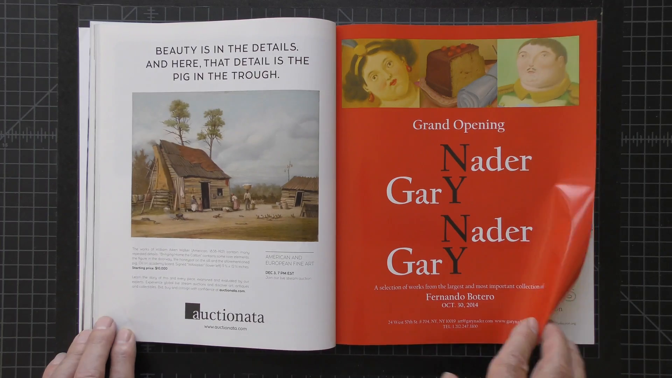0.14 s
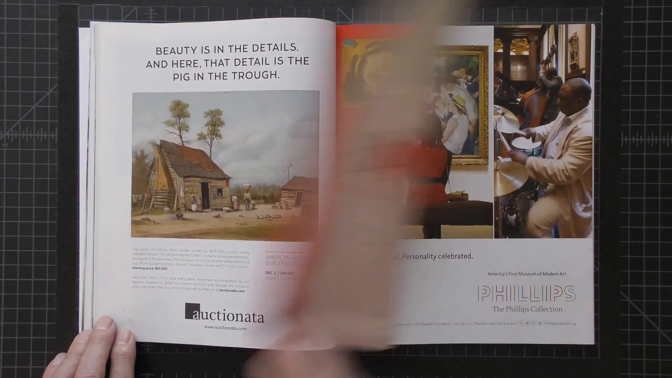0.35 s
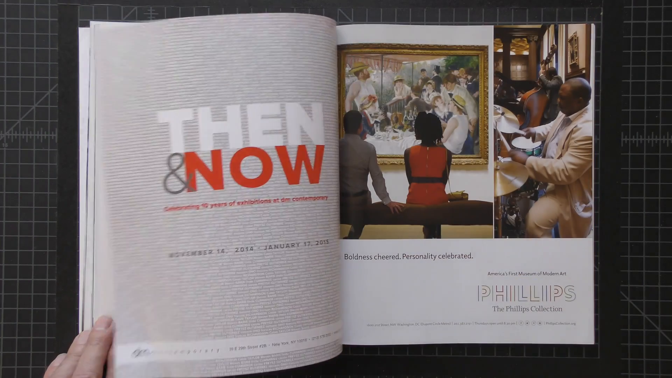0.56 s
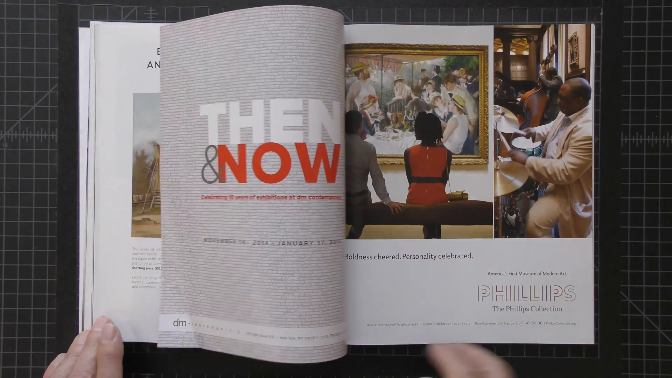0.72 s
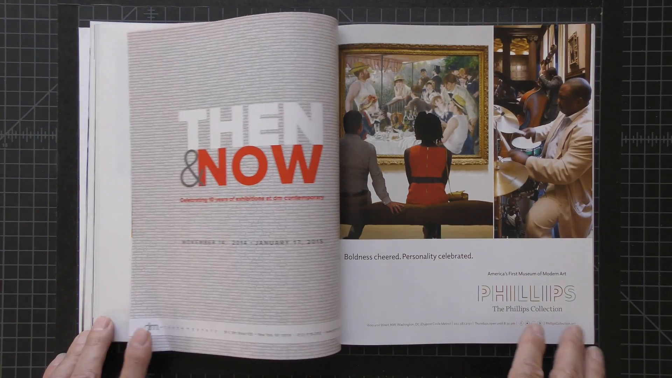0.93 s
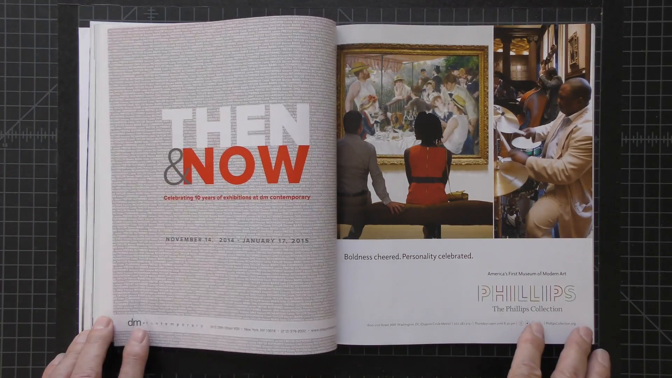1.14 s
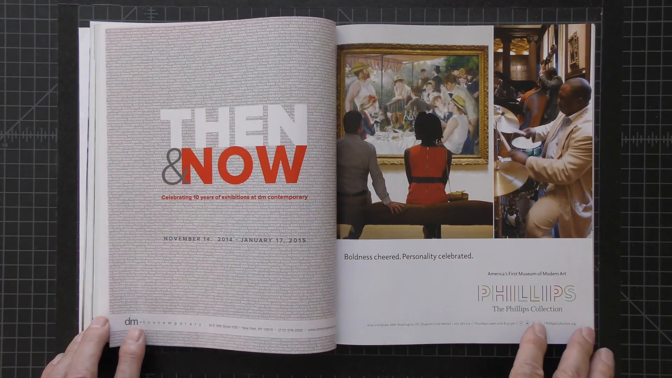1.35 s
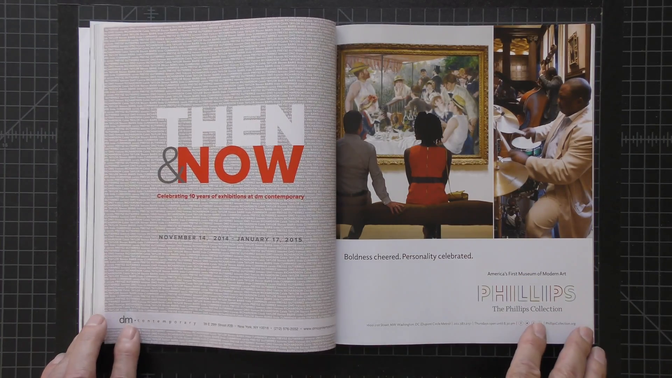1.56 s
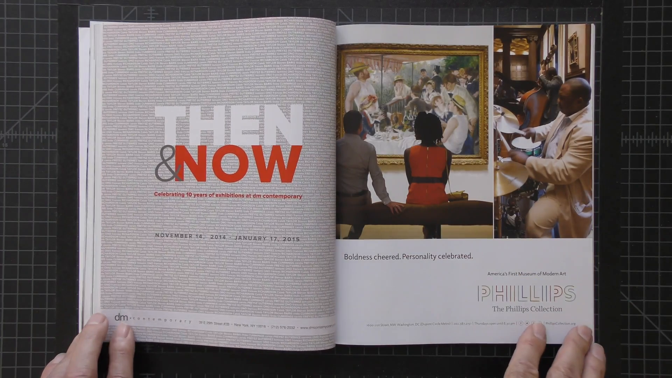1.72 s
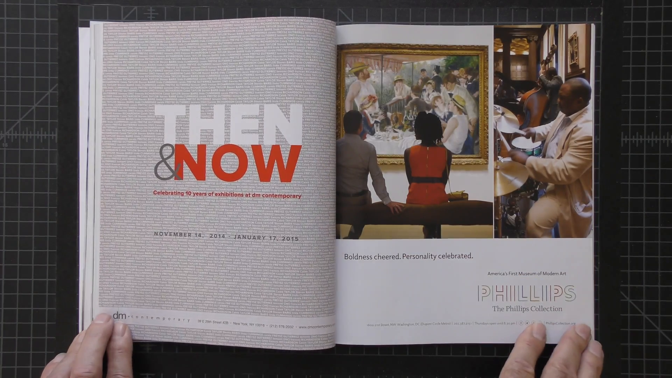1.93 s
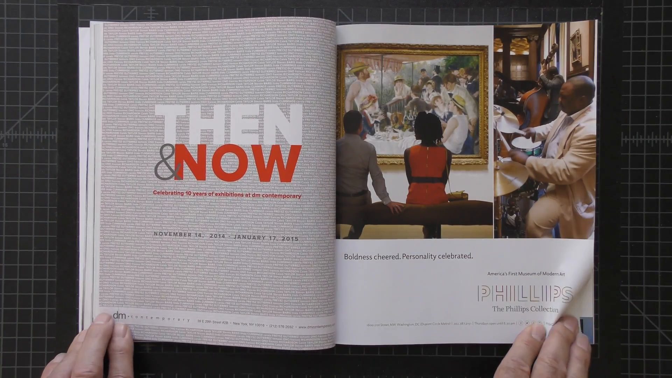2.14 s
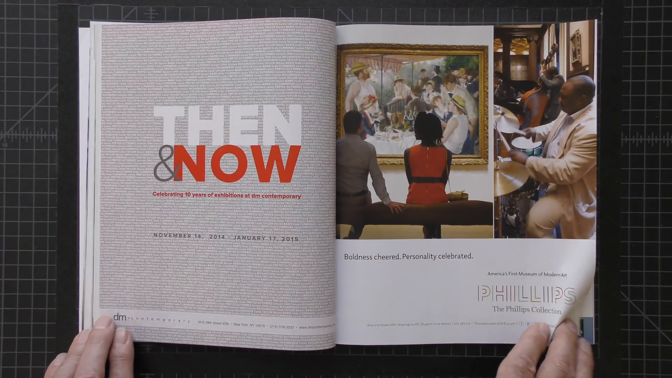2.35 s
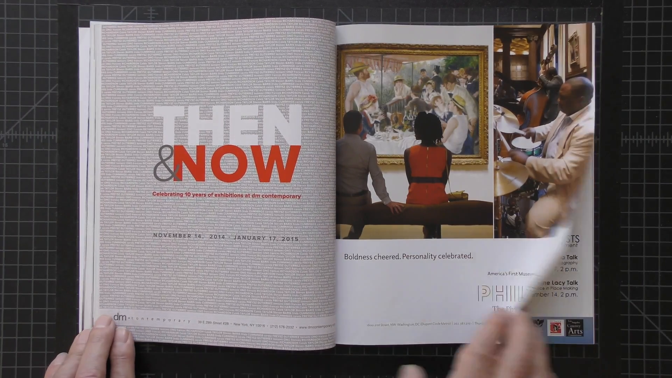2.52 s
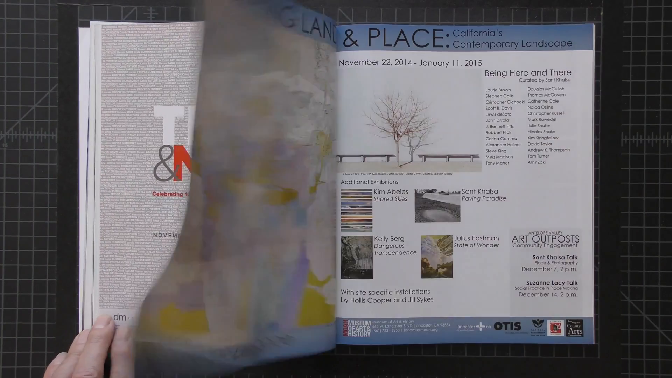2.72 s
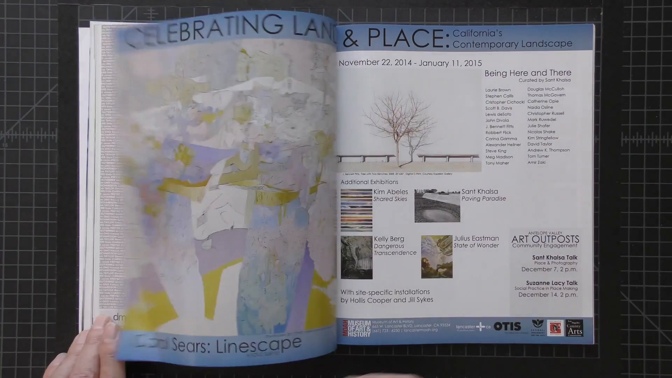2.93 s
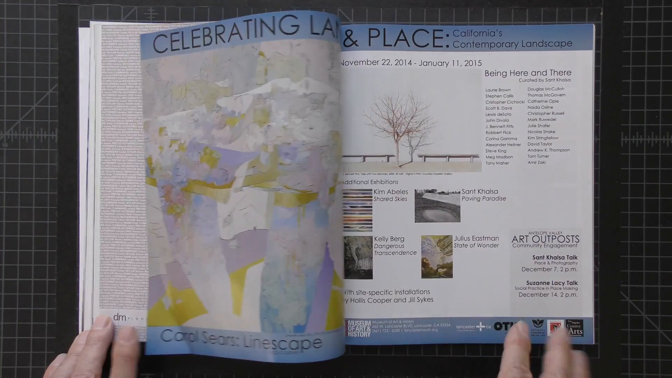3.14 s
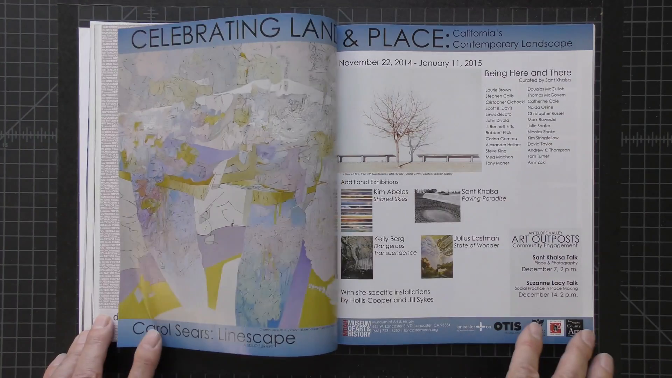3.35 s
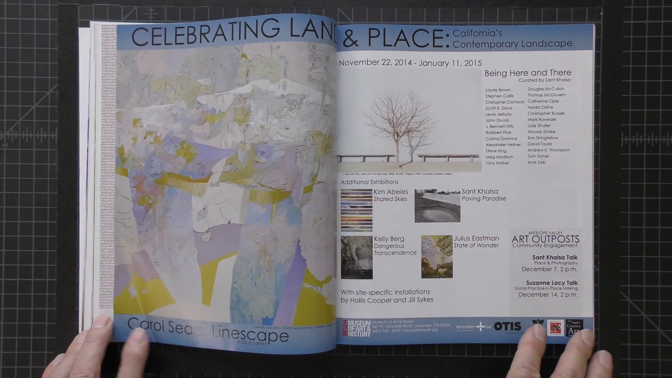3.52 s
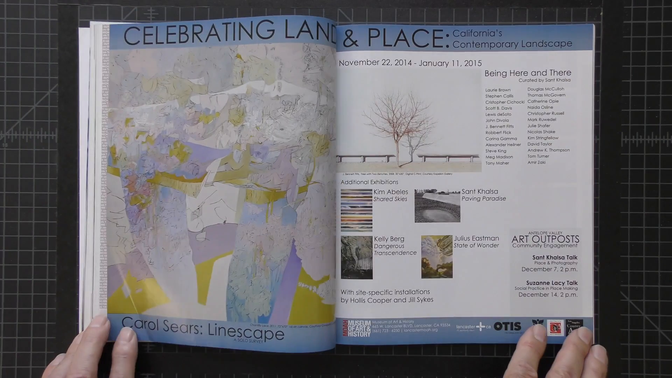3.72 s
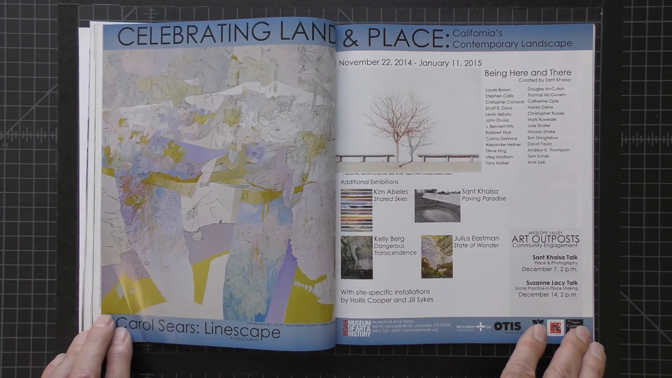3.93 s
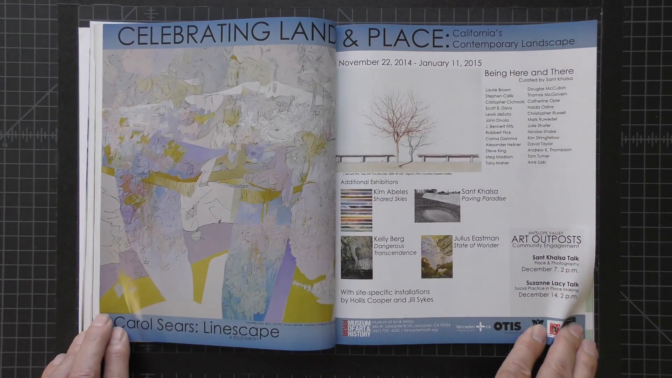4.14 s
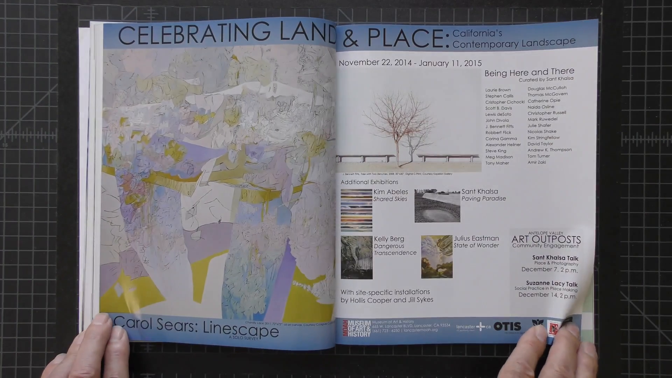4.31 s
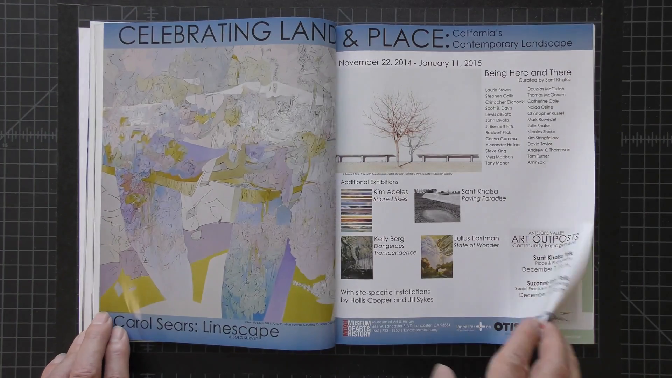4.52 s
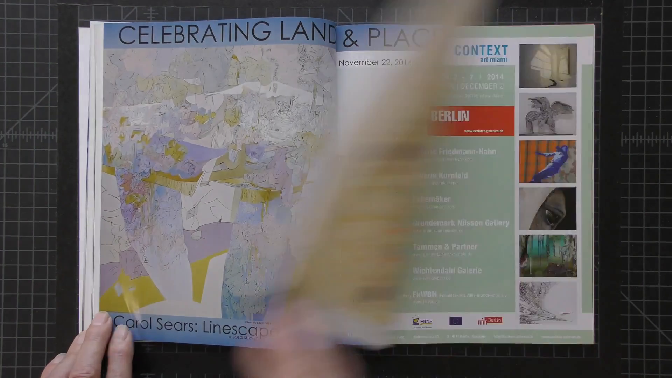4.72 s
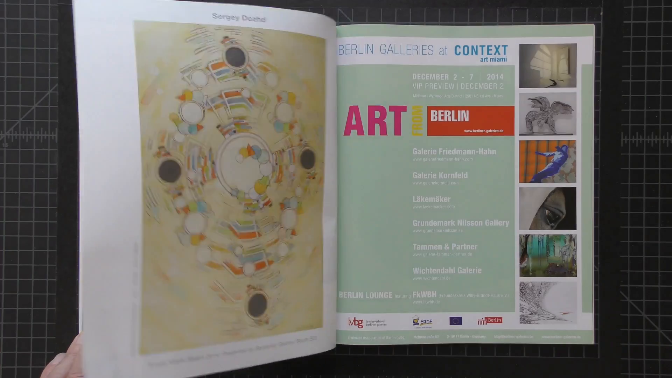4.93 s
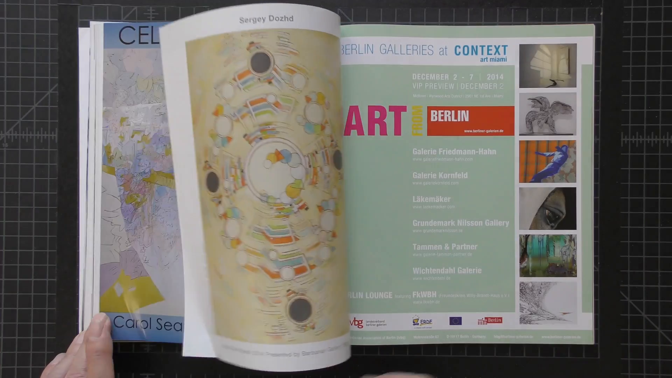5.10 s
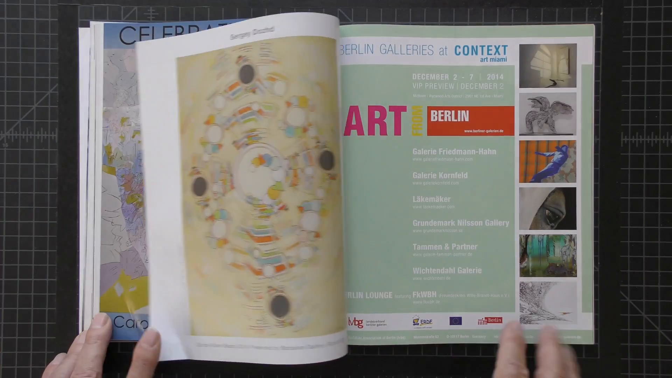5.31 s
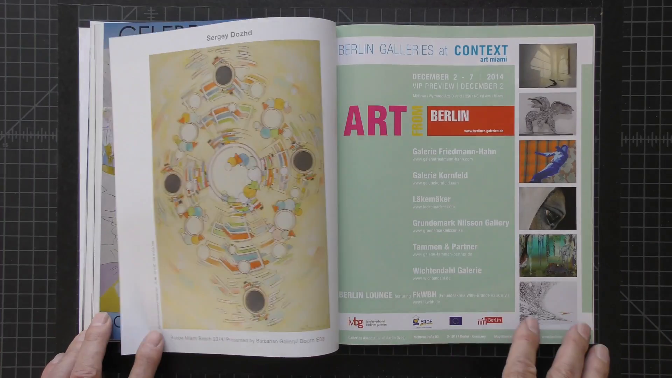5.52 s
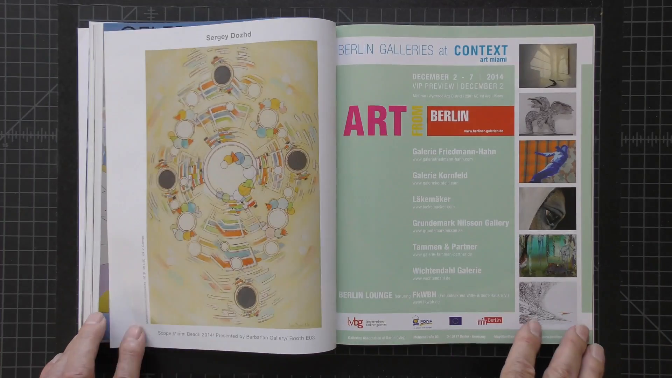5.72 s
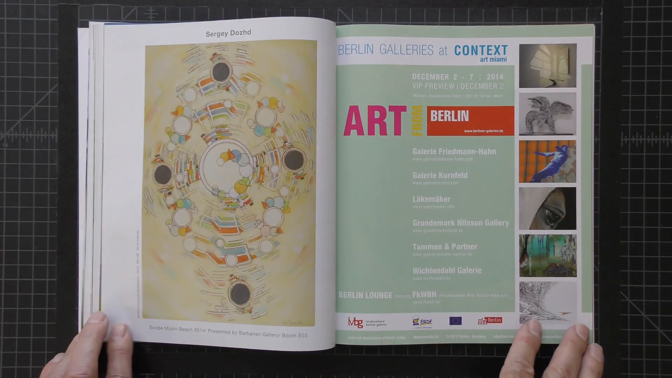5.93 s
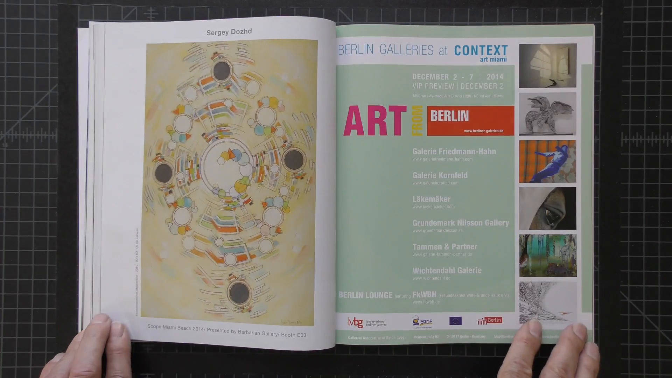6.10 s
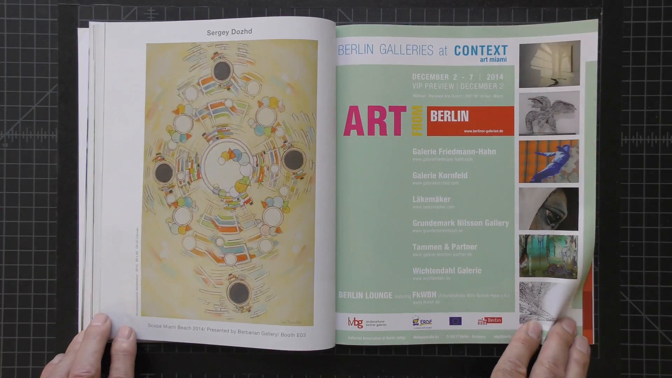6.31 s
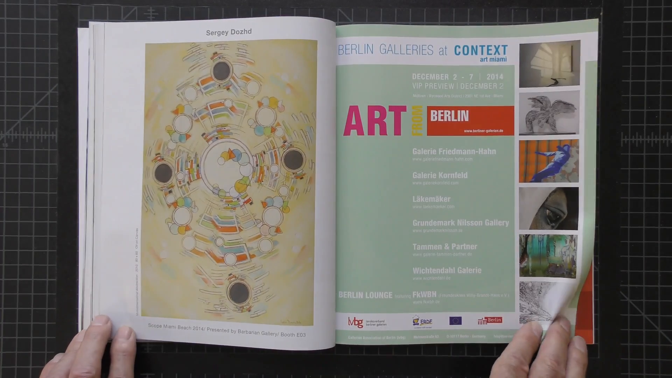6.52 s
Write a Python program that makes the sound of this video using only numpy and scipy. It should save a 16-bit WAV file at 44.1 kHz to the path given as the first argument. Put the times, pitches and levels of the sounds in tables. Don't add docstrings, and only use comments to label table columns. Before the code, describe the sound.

In a quiet, live-sounding room, thick glossy paper is lifted and turned three times. The first turn is a dense loud crackle with a firm thump; the second starts with a hard pinch click, then snaps over more dully; the third is a quick crisp flap. Small skin rubs and ticks separate them. Soft low woody knocks follow near the end, then light finger rustles. Near pair of microphones, slight low hum.

```python
import sys
import numpy as np
from scipy import signal
from scipy.fft import rfft, irfft, next_fast_len
from scipy.io import wavfile
from scipy.ndimage import uniform_filter1d

SR = 44100
rng = np.random.default_rng(int(sys.argv[2]) if len(sys.argv) > 2 else 0)


def elevation(decibels):
    levels = np.asarray(decibels, float)
    return 10 ** (levels / 20)


def unload_audio(sound):
    columns = np.transpose(np.atleast_2d(sound))
    steps = np.round(np.clip(columns, -1, 1) * 32767)
    wavfile.write(sys.argv[1], SR, steps.astype(np.int16))


N = 293706

# pitch_hz, level_db
AIR_SPECTRUM = [(15, -12), (25, -13.5), (50, -5.5), (100, -9.5), (145, -1.5), (440, -7), (607, -23),
                (962, -15), (1740, -13), (2110, -13), (4370, -25), (7310, -28.5), (11600, -26),
                (16000, -29)]
# pitch_hz, likeness (0 to 1)
AIR_LIKENESS = [(30, 0.15), (130, 0.5), (400, 0.12), (1500, 0.14), (6000, 0), (15000, 0.3)]
AIR_DB, HUM_HZ, HUM_DB, HUM_LINE_DB = -57.5, 128, -65, -67

# start_s, length_s, level_db, paper_hz, hiss_above_paper_db
LEFT_STROKES = [(1.297, 0.077, -57.5, 1860, -8.5), (1.415, 0.16, -60, 1980, -12),
                (1.634, 0.062, -55.5, 2210, -9.5), (1.7, 0.19, -74, 2200, 2.5),
                (2.196, .11, -60.5, 2760, -10), (3.15, 0.046, -50.5, 1230, -11.5),
                (3.547, .13, -61, 2450, -3.5), (3.741, .074, -53, 2080, -7),
                (3.893, 0.086, -56.5, 2150, -4.5), (5.486, 0.1, -65, 2300, -10),
                (5.573, 0.07, -57.5, 1940, -4), (5.681, 0.099, -55, 2080, -3.5),
                (5.765, 0.051, -57, 1970, -5), (5.987, .087, -63.5, 4830, -6.5),
                (6.25, 0.034, -69, 2920, 4.5)]
# start_s, length_s, level_db, paper_hz, hiss_above_paper_db
RIGHT_STROKES = [(.044, 0.11, -61.5, 2630, -6.5), (.123, .078, -59, 2780, -6.5),
                 (1.157, 0.079, -60, 2330, -2), (1.566, 0.037, -51, 2600, 0), (1.55, 0.021, -63, 2400, 4),
                 (2.315, .06, -65, 2900, -12), (2.049, 0.074, -57.5, 3740, 1.5),
                 (2.105, 0.12, -66, 2970, 0.5), (4.066, 0.22, -67.5, 3550, 2.5),
                 (4.275, .085, -70.5, 2510, 3), (4.399, 0.12, -60.5, 3400, -7.5),
                 (4.498, 0.085, -66.5, 3060, 0), (5.863, 0.081, -57, 5170, -10),
                 (6.312, 0.087, -56.5, 3480, 0), (6.36, 0.12, -61.5, 3040, -1),
                 (6.507, 0.12, -55.5, 3370, -12), (6.6, 0.11, -67, 2900, 2)]
# start_s, length_s, level_db
GLIDES = [
    (0.822, 0.31, -71.5),
    (3.198, .25, -73),
    (5.246, .31, -67),
]
GLIDE_HZ, GLIDE_HISS_DB = 5500, 11.5
LEFT_PAN_DB, RIGHT_PAN_DB = 5, -5
# pitch_hz, level_db
SKIN_HISS = [(2500, -13), (5000, 5), (6000, 1.5), (7200, 1.5), (8500, 3), (13000, 1.5), (16000, -8)]
# pitch_hz, width_hz, level_db
COATING_WHISTLES = [(5860, 350, -15), (8170, 510, -22.5)]

# start_s, peak_db, ring_hz, tick_above_peak_db, crackle_fade_s (time to fall 60 dB)
PINCHES = [(.222, -29, 1540, -38, 0.15), (.316, -33, 1600, -42, 0.21), (.411, -23, 2255, -19, 0.035),
           (1.572, -32, 1800, 0, 0.02), (2.384, -14, 2240, -17.5, 0.024), (2.392, -34, 5400, -3, 0.09),
           (2.407, -35, 2350, -32, .049), (2.596, -18, 2000, -12, 0.04), (2.604, -27, 4500, -4, 0.05),
           (2.676, -30, 3300, -8, 0.04), (2.594, -38, 2200, -30, .02), (2.607, -35, 3000, -3, .03),
           (2.615, -38, 7400, -3, .03), (2.619, -38, 7000, -2, .03), (2.401, -36, 2200, -12, .03),
           (2.054, -54, 3700, 0, .05), (5.888, -44, 2000, -20, .04), (4.455, -37, 3580, -41, 0.029),
           (4.672, -23, 1600, -22, 0.077), (5.781, -44, 1900, -2, 0.028)]
# start_s, peak_db, ring_hz, tick_above_peak_db
CRACKS = [(.464, -9, 2540, -14), (.473, -9, 1710, -26), (.501, -14, 2320, -27), (.532, -21, 2000, -25),
          (2.73, -23, 1500, -12), (2.737, -20, 1880, -30), (2.75, -5, 2400, -31), (2.772, -22, 1510, -37),
          (2.811, -29, 1750, -40), (2.848, -18, 2090, -53), (2.874, -23.5, 1600, -45),
          (3.036, -21, 1080, -22), (4.823, -27, 1950, -12), (4.854, -16, 2200, -12),
          (4.845, -12.5, 2080, -30), (4.862, -15, 2170, -14), (4.9, -20, 2180, -15),
          (4.905, -14, 2500, -32), (5.027, -21, 1500, -20), (5.028, -25, 3600, -30), (.449, -30, 2000, -7),
          (.454, -19, 1900, -15), (.481, -16, 2400, -14), (.511, -21, 2200, -18), (.544, -27, 1900, -25),
          (.601, -26, 1700, -22), (.64, -26, 1900, -22), (.761, -34, 2160, -20), (2.755, -19, 2000, -35),
          (2.761, -17, 2200, -35), (2.767, -19, 1700, -35), (2.79, -27, 2000, -40), (2.807, -27, 2300, -30),
          (2.83, -27, 1600, -40), (2.881, -27, 1900, -35), (3.032, -22, 1700, -25), (3.088, -37, 1540, -30),
          (4.809, -32, 1960, -24), (4.818, -29, 1800, -12), (4.83, -25, 2000, -12), (4.836, -25, 1900, -18),
          (4.848, -14, 2100, -25), (4.868, -22, 2400, -25), (4.93, -26, 1700, -30), (4.938, -26, 1800, -30),
          (5.032, -25, 1900, -32), (5.042, -27, 1300, -30)]
# start_s, peak_db, ring_hz
TICKS = [(2.244, -41.5, 2500), (3.595, -46, 2860), (4.282, -50, 2510), (4.298, -47, 2220),
         (4.343, -50.5, 2410), (4.326, -49, 2290), (4.363, -51, 3170), (3.707, -50, 2380),
         (4.732, -44, 1400), (6.42, -51, 1880), (6.559, -41, 3420), (6.582, -44, 3400)]
CRACK_FADE_S, TICK_FADE_S, TICK_DB = 0.051, .08, -16.5
# pitch_hz, level_db
TICK_SPECTRUM = [(3500, 5), (6000, 0), (9000, 0.5), (13000, -7), (16500, -14)]
# pitch_hz, level_db
FIZZ_SPECTRUM = [(3500, 5), (5000, 9), (7000, 5), (10000, 2.5), (13000, -36), (16000, -38)]
POP_LAG_S, POP_ROUGHNESS, POP_WIDTH_SHARE = .001, .35, .27

# start_s, level_db, pitch_hz, fade_s (time to fall 60 dB)
THUMPS = [
    (.252, -42, 274.6, 0.059),
    (.472, -23.5, 720, 0.045),
    (2.384, -32.5, 313, 0.03),
    (2.385, -22, 1100, 0.022),
    (2.596, -43.5, 252, 0.11),
    (2.597, -30, 900, .025),
    (3.0, -44, 900, 0.2),
    (4.672, -42.5, 162, 0.11),
]

# start_s, length_s, level_reached_db, bend_hz, brightness_db
SWELLS = [
    (0.372, 0.036, -49, 2190, -13),
    (0.447, 0.023, -24, 2000, -17),
    (0.561, 0.043, -34.5, 1810, -16),
    (2.727, 0.022, -30, 1900, -15),
    (2.826, .023, -31, 1720, -38),
    (2.99, .034, -35.5, 1200, -45),
    (4.808, .034, -31, 1890, -14),
]
# start_s, level_db, fade_s (time to fall 60 dB), bend_hz, brightness_db
FLAPS = [
    (.409, -45, 0.4, 2190, -9),
    (.531, -35, 0.4, 2060, -30),
    (2.604, -47, 0.07, 1630, 0),
    (2.85, -32, 0.25, 1840, -59),
    (4.676, -41.5, 0.14, 1360, -25),
    (4.903, -24.5, 0.055, 2340, -32),
]
# start_s, hold_s, level_db, bend_hz, brightness_db
RATTLES = [
    (.466, 0.017, -21, 1900, -21),
    (0.492, 0.016, -30, 2300, -15),
    (.595, 0.045, -34.5, 1890, -18),
    (2.632, .095, -50, 1740, -14),
    (2.752, 0.017, -24.5, 2110, -52),
    (3.022, 0.027, -30.5, 1180, -25),
    (4.745, 0.07, -55.5, 1640, -11),
    (4.843, 0.023, -22.5, 2200, -27),
    (5.023, 0.019, -30.5, 1470, -28),
]
# start_s, level_db, fade_s (time to fall 60 dB), bend_hz, brightness_db
SETTLES = [
    (.515, -39, 1.2, 2280, -15),
    (.645, -40.5, 1.32, 2000, -16),
    (2.394, -52.5, 0.91, 1920, -8.5),
    (2.775, -32.5, .7, 1870, -42),
    (2.9, -52, 0.49, 1703, -49),
    (3.085, -45.5, 0.6, 1540, -31),
    (4.88, -47, 0.65, 2150, -18),
    (4.917, -33.5, 0.73, 2020, -29),
    (5.05, -41.5, 1.52, 1800, -26.5),
]
# time_s, left_over_right_db
PAGE_PLACE = [(.2, -4), (.41, 3.5), (.45, 2.5), (.6, 4.5), (1.57, 10.5), (2.38, -4.5), (2.6, 4.5),
              (2.74, 1.5), (2.85, 3), (3.04, 4.5), (4.3, 3), (4.67, -4.5), (4.82, 3.5), (4.9, 1), (5.03, 4),
              (6.6, 7)]
# pitch_hz, level_db
PAPER_SPECTRUM = [(500, -48), (900, -3.5), (1300, 2), (2300, -2.5), (3000, -6.5), (3600, -20.5),
                  (4500, -50)]
# pitch_hz, level_db
PUSH_SPECTRUM = [(60, -28), (150, -0.5), (300, 9.5), (500, 7), (700, 1.5), (1000, -35)]
# pitch_hz, level_db
SIZZLE_SPECTRUM = [(2500, -8.5), (3300, 9.5), (4600, 3.5), (6000, -3), (8000, -15.5), (9500, -39),
                   (11000, -53)]
# pitch_hz, level_db
TOP_SPECTRUM = [(6500, -4.5), (8500, 1), (11000, -1.5), (14000, -12), (16000, -13)]
SWELL_DB_PER_S, HEARD_DB, LONGEST_S = 483, 27, 0.65
HOLD_DROP_DB, STOP_S, STOP_DB = -1, .025, 29
BEND_SAG = 0.14
BEND_WIDTH_HZ, RATTLE_WIDTH_HZ, BEND_WANDER = 1500, 680, .07
SIZZLE_DB, SIZZLE_SHARE, PUSH_DB = -2.5, 0.26, -16.5
SIZZLE_STAYS, TOP_STAYS, PUSH_STAYS = 0.098, 0.57, 0.21
SETTLE_STAYS = 0.298
SIZZLE_DB_PER_OCTAVE, MID_BEND_HZ = 15.5, 2000
SETTLE_SIZZLE_DB, SETTLE_SIZZLE_SHARE, RATTLE_SIZZLE_DB = 6.5, 0.17, 0.2

# time_s, level_db
DRAG = [
    (5.748, -48.5),
    (5.78, -43),
    (5.818, -49),
    (5.854, -46.5),
    (5.875, -50.5),
    (5.906, -45.5),
    (5.924, -52),
    (5.99, -54),
    (6.2, -70),
]
# pitch_hz, width_hz, level_db
WOOD_RINGS = [(319, 100, -4.5), (392.4, 93, 1.5), (488, 70, -1.5)]
DRAG_RATTLE_DB = -0.2
# start_s, level_db, pitch_hz, fade_s (time to fall 60 dB)
KNOCKS = [
    (5.752, -41, 470, .09),
    (5.766, -40, 390, .13),
    (5.776, -37, 480, .13),
    (5.83, -41, 410, .11),
    (5.85, -43, 390, .09),
    (5.898, -45, 490, .08),
]

# pitch_hz, fade_s (time to fall 60 dB)
WALL_FADES = [(150, 2.8), (500, 1.7), (1500, 1.58), (3000, 1.41), (6000, 1.3), (12000, 0.72)]
# delay_s, level_db
ECHOES = [(.0016, -24.5), (.0075, -22), (.0105, -21.5), (.0165, -21), (.0225, -27), (.031, -37)]
ROOM_DB = -12
# pitch_hz, gain_db
STEREO_WIDTH = [(60, 0.1), (300, -0.5), (4800, -5), (5400, -11.5), (10500, -11.5), (12000, -2.5),
                (16000, 2)]
FULL_WIDTH_DB, TOP_EDGE_HZ = -36.5, 15750


def evened(x):
    return x / np.sqrt(np.mean(x ** 2) + 1e-20)


def smoothed(x, size):
    return evened(uniform_filter1d(uniform_filter1d(x, size=size), size=size))


def drifting(size, smooth):
    return smoothed(rng.standard_normal(size), smooth)


def read(points, hz):
    f, value = np.transpose(points)
    return np.interp(np.log(hz + 1), np.log(f + 1), value)


def add(mix, start_s, sound, pan_db):
    part = mix[:, round(start_s * SR):][:, :len(sound)]
    part += sound[:part.shape[1]] * elevation(np.array([[pan_db / 2], [-pan_db / 2]]))


def colour(x, points):
    hz = np.fft.rfftfreq(len(x), 1 / SR)
    outside = (hz < .6 * points[0][0]) | (hz > 1.3 * points[-1][0])
    return evened(irfft(rfft(x) * elevation(read(points, hz) - 60 * outside), len(x)))


def ring(x, hz, width_hz):
    r = np.exp(-np.pi * width_hz / SR)
    return signal.lfilter([1, -1], [1, -2 * r * np.cos(2 * np.pi * hz / SR), r * r], x)


def moving_ring(x, hz, width_hz):
    spin = np.exp(2j * np.pi * np.cumsum(hz) / SR)
    r = np.exp(-np.pi * width_hz / SR)
    return evened((spin * signal.lfilter([1 - r], [1, -r], x / spin)).real)


def band(x, low_hz, high_hz):
    return signal.sosfilt(signal.butter(4, [low_hz, high_hz], "band", fs=SR, output="sos"), x)


def grit(size, per_s, spread_db, clump_db):
    bed = rng.standard_normal(size)
    sizes = np.minimum(rng.exponential(1, size), 2.5)
    happens = rng.random(size) < per_s / SR
    slips = np.sign(bed) * elevation(spread_db * sizes) * happens
    return (evened(slips) + 1.53 * bed) * elevation(clump_db * drifting(size, 150))


def air():
    frames, hz = N // 512 + 5, np.fft.rfftfreq(2048, 1 / SR)
    a, b, c, d, patches = rng.standard_normal((frames, 1025, 5)).T
    patches = uniform_filter1d(patches, size=30, axis=0)
    patches = evened(uniform_filter1d(patches, size=8, axis=1))
    fuzzy_hum = elevation(HUM_DB - AIR_DB + 9.5) / (1 + ((hz - HUM_HZ) / 6) ** 2)
    same = np.clip(read(AIR_LIKENESS, hz), -1, 1)[:, None]
    left = a + 1j * b
    right = same * left + np.sqrt(1 - same ** 2) * (c + 1j * d)
    spectra = np.array([left, right]) * (elevation(read(AIR_SPECTRUM, hz)) + fuzzy_hum)[:, None]
    hiss = signal.istft(spectra * elevation(2.0 * patches), nperseg=2048, noverlap=1536)[1][:, :N]
    waver = drifting(N, 4000)
    turns = np.cumsum(HUM_HZ + 2.5 * waver[::-1]) / SR
    hum_line = elevation(HUM_LINE_DB + 2.5 * waver) * np.sin(2 * np.pi * turns)
    return hum_line + elevation(AIR_DB) * evened(hiss) * elevation(np.array([[-.8], [.8]]))


def stroke(length_s, level_db, paper_hz, hiss_db):
    u = np.linspace(0, 1, round(length_s * SR))
    slips = grit(len(u), per_s=5000, spread_db=2.0, clump_db=1.7)
    pressure = np.sin(np.pi * u ** 0.68) ** 1.15
    low_ring = ring(slips, 0.52 * paper_hz, .5 * paper_hz)
    paper = evened(ring(low_ring, 1.13 * paper_hz, .5 * paper_hz))
    hiss = colour(slips, SKIN_HISS)
    for hz, width_hz, whistle_db in COATING_WHISTLES:
        hiss += elevation(whistle_db) * evened(ring(ring(slips, hz, width_hz), hz, width_hz))
    return elevation(level_db) * pressure * (paper + elevation(hiss_db) * hiss)


def snap(peak_db, hz, tick_db, fade_s):
    t = np.arange(6000) / SR
    noise, after_noise = rng.standard_normal((2, len(t)))
    blow = noise * np.exp(-t / 0.00089) * (1 - np.exp(-t / 0.00053))
    creak, soft_after = band([blow, after_noise], .45 * min(hz, 2000), 4200)
    letting_go = band(np.exp(-((t - POP_LAG_S) / .00003) ** 2), .4 * hz, min(2.1 * hz, 15000))
    push = evened(letting_go) + POP_ROUGHNESS * evened(creak)
    pop = evened(ring(push, hz, POP_WIDTH_SHARE * hz)) + 0.6 * evened(push)
    tick = colour(blow, TICK_SPECTRUM) * (t < .01)
    crackle = evened(ring(soft_after, hz, 0.89 * hz))
    crackle += elevation(tick_db + 6.5) * colour(after_noise, FIZZ_SPECTRUM)
    crackle *= elevation(-16.0 - 60 * t / max(fade_s, .01)) * (1 - np.exp(-t / 0.0017))
    tick_part = elevation(tick_db + 6) * tick / abs(tick).max()
    return elevation(peak_db) * (pop / abs(pop).max() + tick_part + crackle)


def thump(level_db, hz, fade_s):
    t = np.arange(5000) / SR
    puff = ring(ring(rng.standard_normal(len(t)), hz, 0.6 * hz), hz, 0.6 * hz)
    return elevation(level_db - 60 * t / fade_s) * evened(puff) * (1 - np.exp(-t / 0.0036))


def moving_sheet(rows, width_hz):
    s, *columns = np.transpose(rows)
    t = np.arange(s[0], s[-1], 1 / SR)
    crackle_db, hz, sizzle_db, top_db, push_db = (np.interp(t, s, c) for c in columns)
    slips = grit(len(t), per_s=3000, spread_db=-1.0, clump_db=1.9)
    fine = 0.24 * evened(slips) + evened(grit(len(t), per_s=4400, spread_db=-6.0, clump_db=2.1))
    bend_drift = np.clip(drifting(len(t), 400), -2, 2)
    slips *= elevation(0.7 * drifting(len(t), 600))
    paper = colour(slips, PAPER_SPECTRUM)
    bend = moving_ring(paper, hz * (1 + BEND_WANDER * bend_drift), width_hz)
    sound = evened(0.18 * paper + bend)
    sound += elevation(push_db) * colour(slips, PUSH_SPECTRUM)
    sound += elevation(sizzle_db) * colour(fine, SIZZLE_SPECTRUM)
    sound += elevation(top_db) * colour(fine, TOP_SPECTRUM)
    edges = np.clip(np.minimum(t - s[0], s[-1] - t) / .001, 0, 1)
    return s[0], sound * elevation(crackle_db - 3.0) * edges


def motion(times, levels_db, hz, bright_db, stays, extra_db=0, width_hz=BEND_WIDTH_HZ):
    drop_db = max(levels_db) - np.array(levels_db)
    bend_hz = hz * (1 - BEND_SAG * drop_db / HEARD_DB)
    sizzle_db = SIZZLE_DB + extra_db + SIZZLE_SHARE * bright_db
    sizzle_db += SIZZLE_DB_PER_OCTAVE * np.log2(hz / MID_BEND_HZ)
    sizzle_path = sizzle_db + stays * SIZZLE_STAYS * drop_db
    top_path = bright_db + stays * TOP_STAYS * drop_db
    push_path = PUSH_DB + PUSH_STAYS * drop_db
    rows = np.transpose([times, levels_db, bend_hz, sizzle_path, top_path, push_path])
    return moving_sheet(rows, width_hz)


def swell(s, length_s, level_db, hz, bright_db):
    levels_db = [level_db - SWELL_DB_PER_S * length_s, level_db]
    return motion([s, s + length_s], levels_db, hz, bright_db, 0.96)


def flap(s, level_db, fade_s, hz, bright_db, stays=1, extra_db=0):
    length_s = min(fade_s * HEARD_DB / 60, LONGEST_S)
    levels_db = [level_db, level_db - 60 * length_s / fade_s]
    return motion([s, s + length_s], levels_db, hz, bright_db, stays, extra_db)


def rattle(s, hold_s, level_db, hz, bright_db):
    times = [s, s + hold_s, s + hold_s + STOP_S]
    levels_db = [level_db, level_db - HOLD_DROP_DB, level_db - STOP_DB]
    return motion(times, levels_db, hz, bright_db, 1, RATTLE_SIZZLE_DB, RATTLE_WIDTH_HZ)


def settle(s, level_db, fade_s, hz, bright_db):
    extra_db = SETTLE_SIZZLE_DB + SETTLE_SIZZLE_SHARE * bright_db
    return flap(s, level_db, fade_s, hz, bright_db, SETTLE_STAYS, extra_db)


def page():
    creases = PINCHES + [row + (CRACK_FADE_S,) for row in CRACKS]
    creases += [row + (TICK_DB, TICK_FADE_S) for row in TICKS]
    sounds = [(s, snap(*rest)) for s, *rest in creases]
    for move, rows in ((swell, SWELLS), (flap, FLAPS), (rattle, RATTLES), (settle, SETTLES)):
        sounds += [move(*row) for row in rows]
    out = np.zeros((2, N))
    for s, sound in sounds:
        add(out, s, sound, np.interp(s, *np.transpose(PAGE_PLACE)))
    return out


def drag():
    s, level_db = np.transpose(DRAG)
    t = np.arange(s[0], s[-1], 1 / SR)
    slips = grit(len(t), per_s=3000, spread_db=1.5, clump_db=1.5)
    low = np.zeros(len(t))
    for hz, width_hz, ring_db in WOOD_RINGS:
        low += elevation(ring_db) * evened(ring(ring(slips, hz, width_hz), hz, 170))
    thin = evened(ring(ring(slips, 800, 346), 1620, 1800))
    sound = evened(low) + elevation(DRAG_RATTLE_DB) * thin
    return s[0], elevation(np.interp(t, s, level_db) - 5.5) * sound * signal.windows.tukey(len(t), .008)


def knock(level_db, hz, fade_s):
    t = np.arange(9000) / SR
    tone = np.sin(2 * np.pi * hz * t + 2 * np.pi * rng.random())
    return elevation(level_db - 60 * t / fade_s) * tone * (1 - np.exp(-t / .002))


def room(x):
    taps = np.zeros((2, 60000))
    at = np.arange(500, 59980, 20) + rng.integers(0, 20, (2, 2974))
    np.put_along_axis(taps, at, rng.choice([-1., 1.], at.shape), 1)
    hz, t, z = signal.stft(taps, SR, nperseg=256)
    fading = elevation(-60 * t / read(WALL_FADES, hz)[:, None])
    tail = signal.istft(z * fading, SR, nperseg=256)[1]
    tail *= elevation(ROOM_DB) / np.linalg.norm(tail[0])
    for s, db in ECHOES:
        tail[0, round(s * SR)] += elevation(db)
        tail[1, round(s * SR) + rng.integers(-4, 5)] += elevation(db)
    return signal.fftconvolve(x.mean(0)[None], tail, axes=1)[:, :N]


def scene():
    near = page()
    left = LEFT_STROKES + [row + (GLIDE_HZ, GLIDE_HISS_DB) for row in GLIDES]
    groups = ((stroke, left, LEFT_PAN_DB), (stroke, RIGHT_STROKES, RIGHT_PAN_DB),
              (thump, THUMPS, -1.2), (knock, KNOCKS, .6))
    for source, rows, pan_db in groups:
        for s, *rest in rows:
            add(near, s, source(*rest), pan_db)
    add(near, *drag(), .6)
    return near + room(near) + air()


def band_limit(x):
    return signal.sosfilt(signal.butter(12, 16820, fs=SR, output="sos"), x)


def record(dry):
    mid, side = (dry[0] + dry[1]) / 2, (dry[0] - dry[1]) / 2
    size = next_fast_len(N)
    width_gain = elevation(read(STEREO_WIDTH, np.fft.rfftfreq(size, 1 / SR)))
    narrow = irfft(rfft(side, size) * width_gain, size)[:N]
    power_db = 10 * np.log10(abs(uniform_filter1d(mid ** 2, size=800)) + 1e-12)
    side = narrow + (side - narrow) * np.clip((power_db - FULL_WIDTH_DB) / 6, 0, 1)
    pair = np.array([mid + side, mid - side])
    low_pass = signal.firwin(255, TOP_EDGE_HZ, window=("kaiser", 5), fs=SR)
    mix = signal.oaconvolve(pair, low_pass[None], "same", axes=1)
    return band_limit(mix)


dry = scene()
out = record(dry)
unload_audio(out)
```